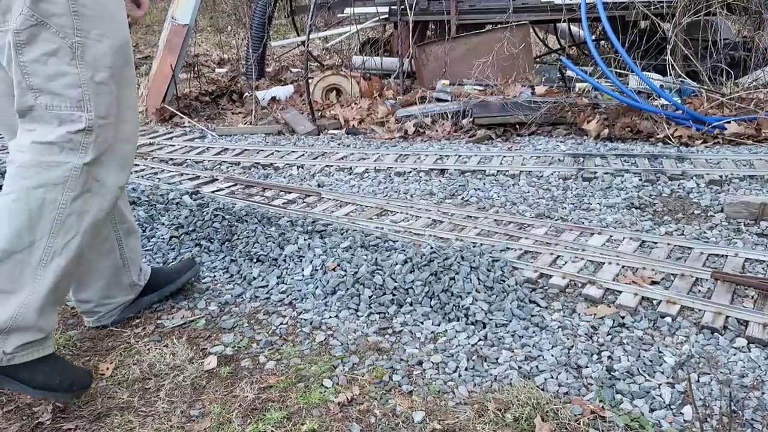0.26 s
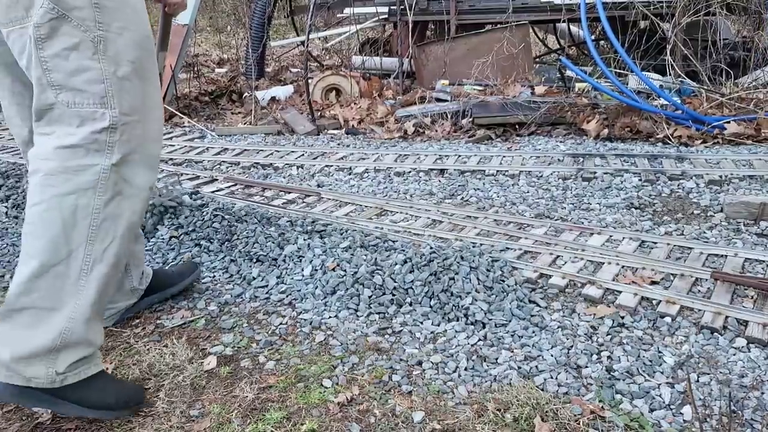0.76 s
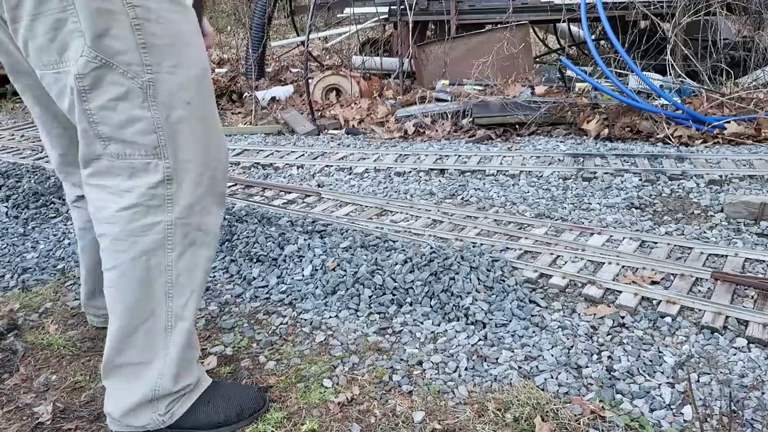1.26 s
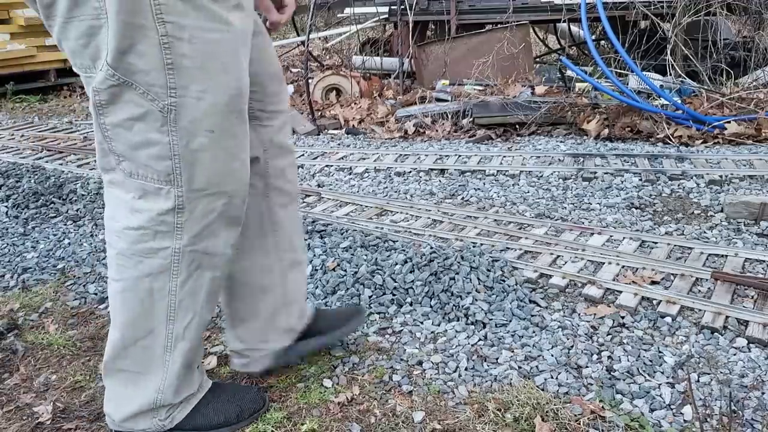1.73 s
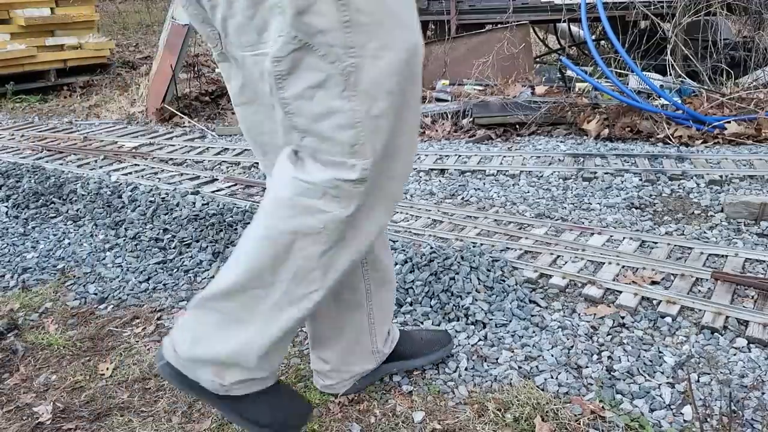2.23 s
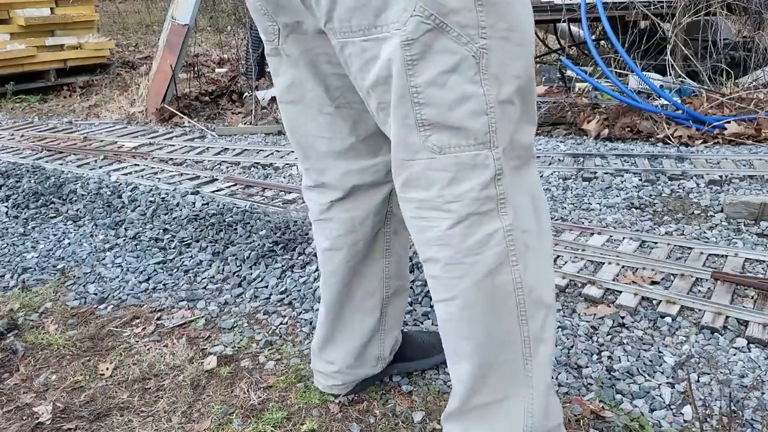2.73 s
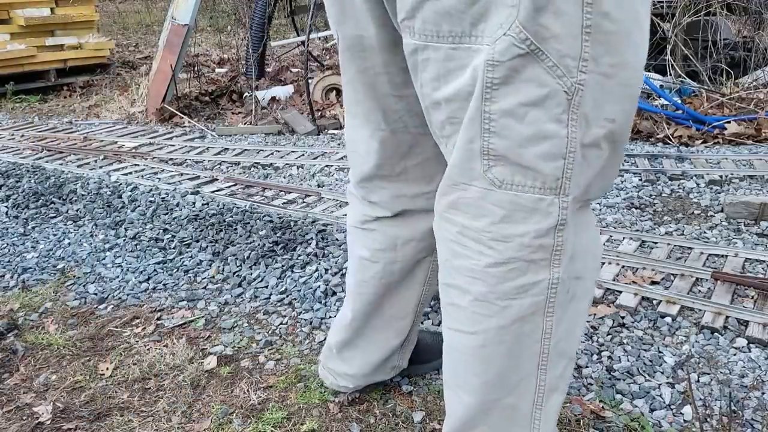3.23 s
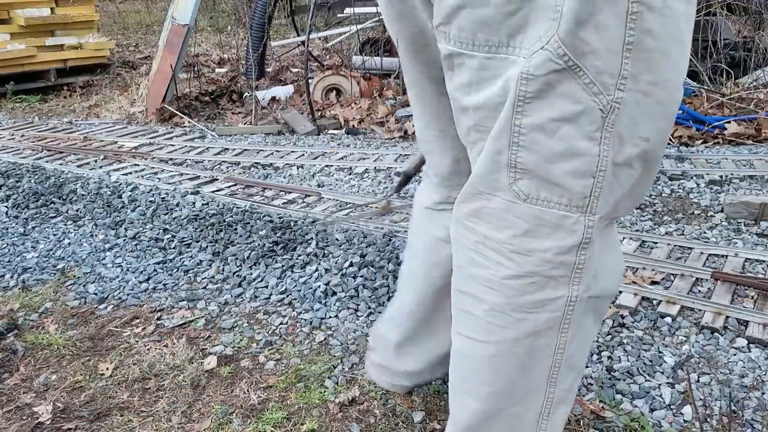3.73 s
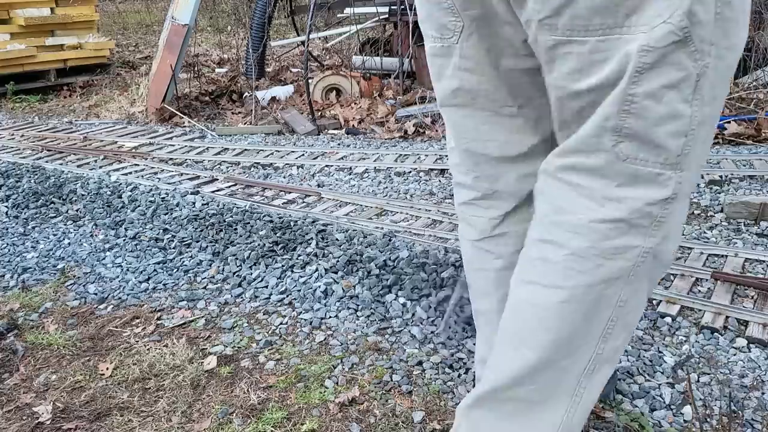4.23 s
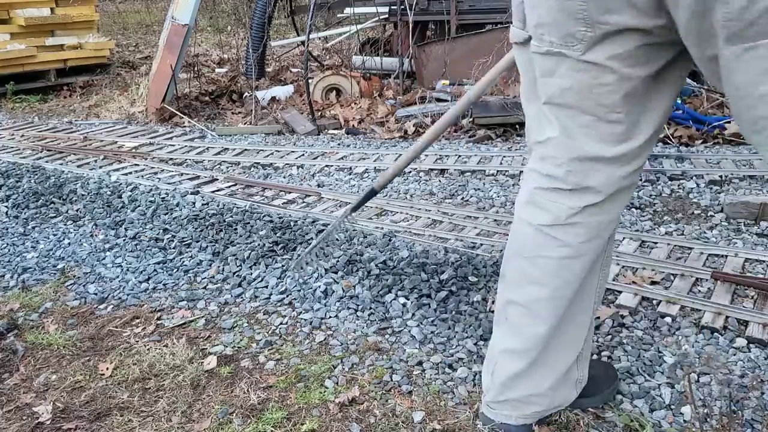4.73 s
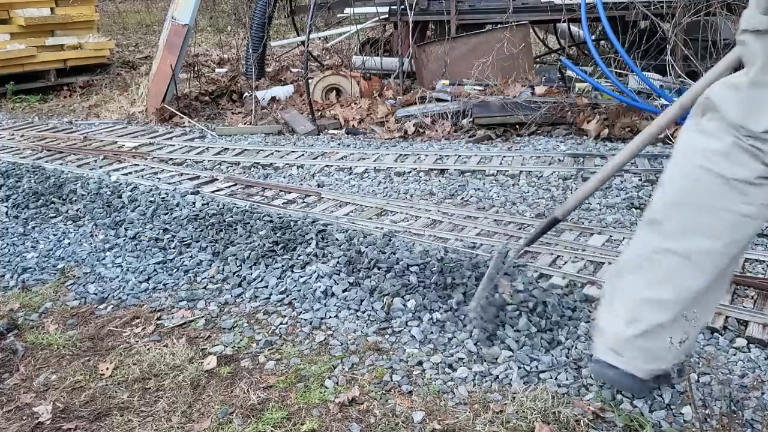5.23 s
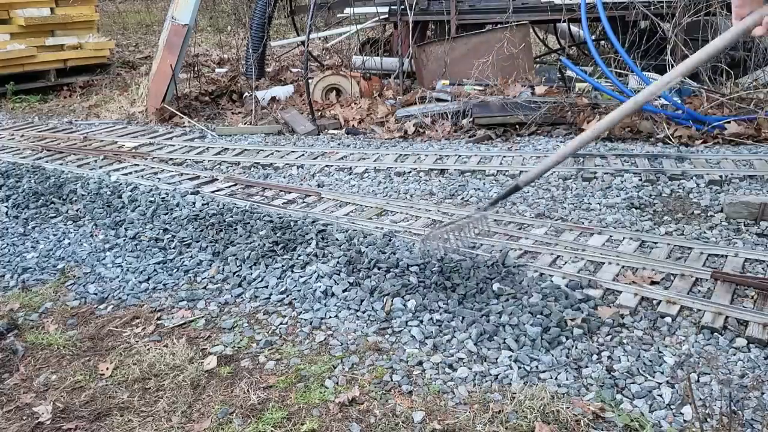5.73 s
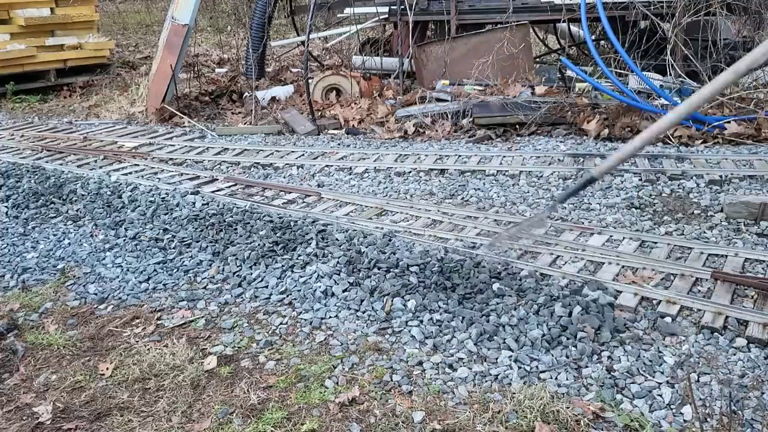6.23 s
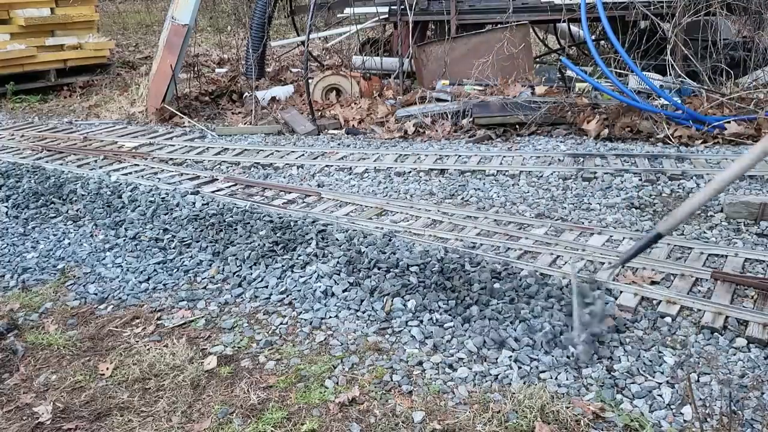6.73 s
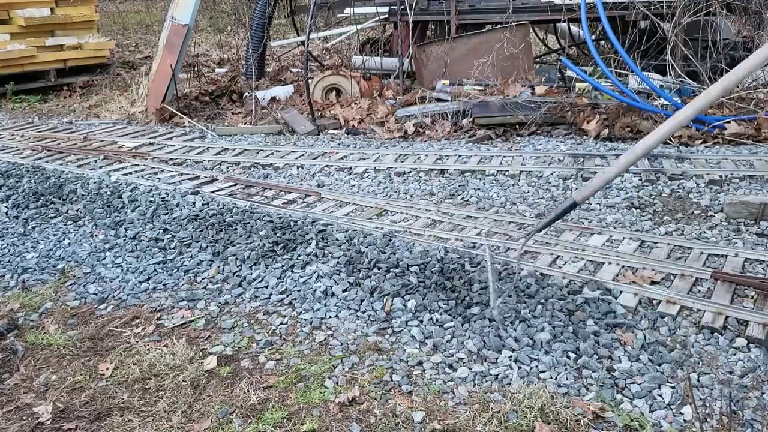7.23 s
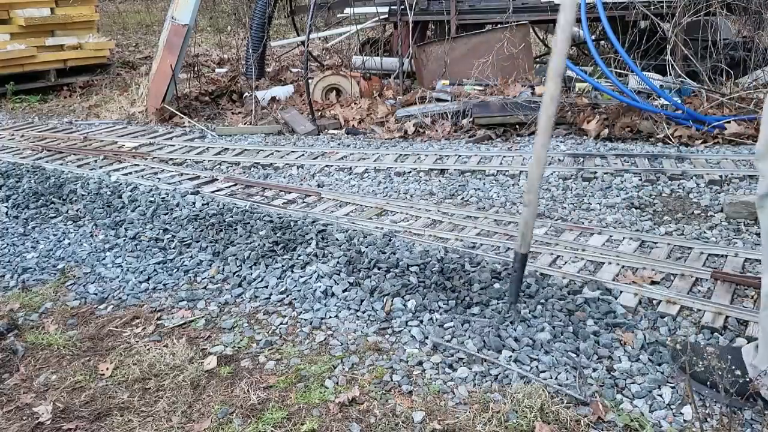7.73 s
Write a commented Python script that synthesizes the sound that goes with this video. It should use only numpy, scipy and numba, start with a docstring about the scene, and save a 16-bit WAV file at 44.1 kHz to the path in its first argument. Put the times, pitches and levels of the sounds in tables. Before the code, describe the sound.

Outdoors, a metre or two from the microphone, a faint hollow knock gives way to repeated raking of coarse gravel. Each pull brings a bright crunch and clatter with small metallic rings from the rake head, then loose pebbles tick as they settle. Shoes scuff lightly and bigger stones thud now and then. The last stroke is lighter, ending with a faint squeak over a soft background hush.

```python
"""Crushed stone crunches under a steel rake, dragged in short strokes across a yard.
Thousands of stones click against each other and the tines; the rake head rings and twice squeaks.
Shoes shift, big stones thud and pebbles trickle after the strokes. A hollow board rattles at the start,
and a faint outdoor hush fills the gaps. Heard from a metre or two, on a phone with two microphone ports."""
import sys
import numpy as np
from scipy import signal
from scipy.fft import rfft, irfft, next_fast_len
from scipy.io import wavfile
from scipy.ndimage import uniform_filter1d, map_coordinates
from numba import njit

SR = 44100
rng = np.random.default_rng(int(sys.argv[2]) if len(sys.argv) > 2 else 0)


def master(y):
    """Save y as 16-bit WAV."""
    cut = np.clip(np.atleast_2d(y).T, -1, 1)
    pcm = np.round(cut * 32767)  # scale
    wavfile.write(sys.argv[1], SR, pcm.astype(np.int16))


N = 351477
TIME = np.arange(N) / SR


def undb(db):
    return 10 ** (np.asarray(db) / 20)


def db_at(hz, points):
    """Reads (hz, db) points on a log-frequency axis."""
    point_hz, db = np.transpose(points)
    return np.interp(np.log(np.maximum(hz, 1)), np.log(point_hz), db)


def colour(x, points):
    """Filters by (hz, db) points."""
    size = next_fast_len(N)
    hz = np.arange(size // 2 + 1) * SR / size
    return irfft(rfft(x, size) * undb(db_at(hz, points)), size)[..., :N]


def wander(rate_hz):
    """Random levels, each gliding to the next; spread near 1."""
    hold = int(SR / rate_hz)
    steps = np.repeat(rng.standard_normal(N // hold + 1), hold)
    return 0.97 * uniform_filter1d(steps, hold)[:N]


@njit
def damped_sines(start, hz, t60, gain, onset_rate):
    """Rings with a rounded onset, each starting at its own fractional sample at each port."""
    out = np.zeros((2, N))
    for k in range(len(hz)):
        fall, turn = -np.log(1000.) / (t60[k] * SR), 2 * np.pi * hz[k] / SR
        pole, onset_pole = np.exp(complex(fall, turn)), np.exp(-onset_rate * turn)
        for port in range(2):
            first = max(int(start[port, k]) + 1, 0)
            late = first - start[port, k]
            phasor = gain[port, k] * np.exp(complex(fall, turn) * late)
            onset = np.exp(-onset_rate * turn * late)
            for i in range(first, min(first + int(.7 * t60[k] * SR), N)):
                out[port, i] += phasor.imag * (1 - onset)
                phasor *= pole
                onset *= onset_pole
    return out


def strike(start_s, db, hz, t60, pan_db, scatter_ms=0.):
    """Rings placed by lag and balance; low-mid waves bend round the phone and lag more."""
    bend = 1 + 2.4 / (1 + (hz / 900) ** 2 + (250 / hz) ** 2)
    lag_s = (by_stroke(start_s, STROKE_PATCHES, LAG_COLUMN) * bend + scatter_ms) / 1000
    side = np.array([[.5], [-.5]])
    return damped_sines((start_s + side * lag_s) * SR, hz, t60, undb(db + side * pan_db), onset_rate=0.58)


# The air beyond the yard: frequency_hz, density_db
HUSH_SPECTRUM = [(15, -39), (25, -9.5), (58, -1), (95, -4.5), (167, -11), (687, -24), (746, -17.5),
                 (979, -27), (3910, -42), (5570, -45.5), (8600, -54.5), (11900, -58.5), (16500, -49.5)]

def hush(level_db=-55.5):
    """Distant air and traffic; the bass is nearly alike at both ports."""
    mid, side = colour(rng.standard_normal((2, N)), HUSH_SPECTRUM)
    side = colour(side, [(60, -10.0), (150, -18), (600, 8), (2000, 4.5)])
    ports = mid + side * np.array([[1], [-1]])
    return ports * undb(level_db + 2.0 * wander(2.7)) / np.std(mid)


# Modes of a hollow board, centred between the ports: pitch_hz, level_db, t60_s
BOARD_MODES = [(131.6, -31, 0.53), (180.2, -28.5, 0.43), (324, -36.5, 0.31)]

def board():
    """A hollow knock dying away as the scene opens, its ring shaken by a rattle."""
    hz, db, t60 = np.transpose(BOARD_MODES)
    knock = strike(np.zeros_like(hz), db, hz, t60, pan_db=0.)
    return knock * undb(2.6 * wander(70)) * np.minimum(TIME / 0.025, 1)


# Shoes and big stones hit the bed, close by: start_s, level_db, pitch_hz
DULL_BLOWS = [(0.49, -32, 700), (0.583, -34, 380), (1.146, -26.5, 594), (1.196, -22, 700),
              (1.282, -40, 620), (1.87, -36, 397), (2.681, -25, 390), (2.724, -24, 557), (2.76, -23, 571),
              (2.832, -20.5, 191), (3.28, -40, 347), (3.873, -22, 562), (4.479, -40, 430),
              (4.797, -27.5, 710), (5.328, -40, 356), (5.372, -34, 596), (5.405, -27.5, 427),
              (5.762, -33, 293), (5.811, -35.5, 355), (5.841, -19, 361), (5.88, -14.5, 357),
              (5.905, -17.5, 397)]

def thuds(t60_s=0.016):
    """Low blows of a few cycles with a woody overtone."""
    start_s, db, hz = np.transpose(DULL_BLOWS)
    start_s, t60 = start_s + .0025, np.full_like(hz, t60_s)
    body = strike(start_s, db + 9.5, hz, t60, pan_db=-1.2)
    return body + strike(start_s, db + 5.0, 1.9 * hz, 0.64 * t60, pan_db=-1.)


# Single pebbles drop between strokes: start_s, level_db, pitch_hz
PEBBLE_DROPS = [(0.197, -52, 5860), (0.2204, -36.5, 6800), (1.6086, -37, 4530), (2.449, -47, 7470),
                (3.548, -33, 6360), (4.553, -38, 5900), (4.6344, -59, 5870), (4.6728, -53, 3430),
                (5.5415, -28.5, 5960), (6.1427, -40, 6000), (6.1594, -40, 7040), (6.181, -43, 6900),
                (6.199, -44, 6920), (6.2302, -41.5, 6000), (6.2526, -30, 3620), (6.2624, -43.5, 7500),
                (6.319, -41, 3600), (6.355, -45, 4000), (6.7347, -13, 13700), (6.7582, -27, 6280),
                (6.973, -36.5, 5700), (7.021, -39.5, 5820), (7.0494, -54, 6000), (7.0642, -61, 7360)]

def pebbles(surge_db, count=500, partials=7):
    """Thin bright ticks of settling pebbles: the listed drops and a random scatter."""
    when, pitch, luck = rng.random((count, 3)).T
    start_s = np.sort(when) * N / SR
    hz = 4000 + 5000 * pitch
    db = np.minimum(bed(start_s, hz, surge_db)[0], -48)  # ticks stay small in the thick of a stroke
    db = db + 4.5 - 2.7 * np.log(luck + .01)
    start_s, db, hz = np.hstack([[start_s, db, hz], np.transpose(PEBBLE_DROPS)])
    pan_db = by_stroke(start_s, STROKE_PATCHES, PAN_COLUMN)
    ratios = np.exp(0.61 * rng.standard_normal((len(hz), partials))).T
    t60 = np.full_like(hz, .004)
    return sum(strike(start_s, db - 7.5, np.clip(hz * r, 1500, 15500), t60, pan_db) for r in ratios)


# The rake head in the air, just right of centre: start_s, level_db, pitch_hz, t60_s
LIFT_RING = [(4.3, -63, 2064, 1.6)]

def lifted_head():
    """Clear of the stones, the steel rings on faintly."""
    return strike(*np.transpose(LIFT_RING), pan_db=-2.)


# A tine chatters on stone, one curve a squeak: time_s, pitch_hz, level_db, octave_db
SQUEAK_CURVES = [
    [(2.68, 1330, -32, -14), (2.716, 1274, -24, -23), (2.88, 1276, -37, -8)],
    [(7.74, 834, -53, -9), (7.85, 914, -40.5, -5), (7.94, 927, -47.5, -5), (7.97, 900, -60, -12)],
]

def squeaks(slips=70):
    """Uneven slips, each a short ring at the chatter pitch, its octave and a lower partial."""
    out = 0
    for time_s, pitch_hz, level_db, octave_db in map(np.transpose, SQUEAK_CURVES):
        start_s = rng.uniform(time_s[0], time_s[-1], slips)
        detune, force = rng.standard_normal((slips, 2)).T
        hz = np.interp(start_s, time_s, pitch_hz) * (1 + 0.015 * detune)
        db = np.interp(start_s, time_s, level_db) + 4.2 * force + 0.5
        for ratio, partial_db in [(1, 0), (2, np.interp(start_s, time_s, octave_db)), (.72, -11)]:
            out = out + strike(start_s, db + partial_db, hz * ratio, 55 / hz, pan_db=-1.6)
    return out


# Modes of the steel head: pitch_hz, level_db, t60_s
HEAD_MODES = [(860, -13, 0.013), (1027, 1, 0.074), (1170, -6, 0.014), (1303.5, 0, 0.11), (1406, -4.5, 0.22),
              (1786, 1, 0.09), (2042, 0, 0.051), (2256, -5, 0.18), (2706, -2.5, 0.11), (3308, -0.5, 0.072),
              (3506, 0, 0.041), (4044, -8.5, 0.13), (4980, -4.5, 0.07), (4810, -3.5, 0.023),
              (5570, -2.5, 0.044), (5870, -3.5, 0.021), (6400, -8.5, 0.016), (7470, -6, 0.044)]
# How strongly the steel rings, one row a stroke: low_modes_db, high_modes_db
HEAD_RING = [(-1, -0.5), (-3, 2.5), (0, 2), (-3.5, 1), (4, 3), (-3.5, -0.5), (-1.5, -2), (-3, 0), (-2, 1),
             (-1, 0.5), (-8, 3)]

def rake_head(surge_db, count=9000, ping_db=-8.5, spread_db=2.0):
    """Stones knock the steel head; each knock rings one of its modes."""
    when, pick, luck = rng.random((count, 3)).T
    detune, side = rng.standard_normal((count, 2)).T
    start_s = np.sort(when) * N / SR
    hz, mode_db, t60 = np.array(HEAD_MODES)[(pick * len(HEAD_MODES)).astype(int)].T
    hz = hz * (1 + .006 * detune)
    db, pan_db = bed(start_s, hz, surge_db)
    ring_db = np.where(hz < 2000, by_stroke(start_s, HEAD_RING, 0), by_stroke(start_s, HEAD_RING, 1))
    db = db + ring_db + mode_db + ping_db - spread_db * np.log(luck + 0.0079)
    return strike(start_s, db, hz, t60, pan_db + 5.64 * side)


# Typical ring of deep stones, big stones, crunch, grit and dust: pitch_hz
STONE_SIZE_HZ = [450, 1200, 2900, 6000, 12000]

def sizes(deep_db, big_db, grit_db, dust_db):
    """Levels of the five stone sizes relative to the crunch, as a column."""
    return np.array([[deep_db], [big_db], [0], [grit_db], [dust_db]])


# Shoes shift on the stones: start_s, length_s, crunch_db, then relative deep_db, grit_db, dust_db
SHOE_SHIFTS = [(0.048, 0.079, -52.5, 16, 14, 16), (0.718, 0.2, -61, -3, 17, 23),
               (1.518, 0.11, -64, -4, 16, 24.4), (3.438, 0.11, -68, 11.5, 18, 20),
               (5.308, 0.15, -50.5, 20.5, 5.9, 8.1), (6.028, 0.24, -54, -5, 2.3, 1.8),
               (6.708, 0.19, -53.5, 11.5, 9, 7.2)]

def shoe_power(t, big_db=-5.5):
    """Power by stone size as a sole presses, grinds grit and eases off."""
    power = 0
    for start_s, length_s, db, deep_db, grit_db, dust_db in SHOE_SHIFTS:
        press = np.sin(np.pi * np.clip((t - start_s) / length_s, 0, 1))
        power = power + (press * undb(db + sizes(deep_db, big_db, grit_db, dust_db))) ** 2
    return power


# One curve a stroke, from first touch and landing (second point) to the lift: time_s, drag_db
STROKE_CURVES = [
    [(-.02, -69), (0.0, -39.5), (.02, -45)],
    [(.31, -64), (.318, -46), (0.48, -25.5), (.61, -29.5)],
    [(.995, -66), (1.012, -38), (1.06, -46.5), (1.177, -26), (1.444, -35)],
    [(1.80, -69), (1.838, -35.5), (1.978, -23.5), (2.016, -43), (2.05, -29), (2.162, -30.5)],
    [(2.64, -73), (2.676, -41), (2.78, -32.5), (2.84, -23.5), (3.01, -39.5), (3.16, -35), (3.36, -44.5),
     (3.4, -42.5)],
    [(3.79, -61), (3.802, -41.5), (3.91, -43), (3.955, -29.5), (4.09, -31.5), (4.18, -39.5)],
    [(4.703, -75), (4.709, -27), (4.726, -22), (4.735, -24)],
    [(4.786, -64), (4.79, -29.5), (4.81, -33), (4.84, -28.5), (4.92, -29), (5, -30), (4.99, -39),
     (5.03, -29), (5.262, -41)],
    [(5.694, -49), (5.705, -38), (5.8, -30), (5.9, -25.5), (5.905, -20.5)],
    [(6.375, -56), (6.388, -42), (6.46, -58), (6.48, -31.5), (6.635, -25.5)],
    [(7.44, -62), (7.452, -35.5), (7.48, -46.5), (7.7, -55)],
]
# How each stroke begins and ends: landing_db, settle_db_per_s, trickle_db, trickle_tilt_db_per_size
STROKE_ENDS = [(-60, 178, -65, .5), (-33, 163, -53.5, 1), (-31, 205, -60, .5), (-46.5, 110, -51.5, 3),
               (-25.5, 203, -56, .5), (-26, 91, -56.5, .5), (-32, 899, -71, -2.5), (-30.5, 80.5, -60, -0.5),
               (-17.5, 194, -59, -3), (-25, 345, -59.5, 0), (-49, 34, -70.5, -4)]
# The ground under each stroke and where it lies from the phone: deep_db, big_db, grit_db, dust_db,
# brighten_db_per_s_per_size, left_minus_right_db, left_base_lag_ms
STROKE_PATCHES = [(8, 0, 0, 4, -1, -0.5, -0.14), (-6, 4, -2, -6, 4, 2.1, -.14),
                  (-5, 2.5, -3, -4.5, 5.5, 1, -0.13), (-8, -1.5, 0.5, -6, 6, 0, -0.013),
                  (0, 0, 1.5, -5, 3, -3.5, 0.13), (-7, -6, 1, -1.5, 4, 0, 0.053),
                  (-30, -12, -7, -32.5, 6, -1, 0.029), (-6.5, -4.5, -1.5, 0, 2.5, -3, 0.086),
                  (-1, -5, 1, -2, -4.5, -2.5, 0.13), (-18, -2.5, -0.5, 3.5, -11.5, -2, 0.16),
                  (1.5, -2, -3, -2, -10, -1.5, 0.13)]
PAN_COLUMN, LAG_COLUMN = 5, 6

def stroke_power(t, landing_s=0.011, landing_fall_db_per_s=501.5, trickle_fall_db_per_s=38.5):
    """Power by stone size: the rake lands, drags and lifts; the bed settles and late stones roll on."""
    power = 1e-10
    size_step = np.arange(len(STONE_SIZE_HZ))[:, None] - 2
    landing_mix, trickle_mix = sizes(-11, -7.5, -5.5, -6.5), sizes(14, 2.5, 6.6, 3.5)
    for curve, ends, patch in zip(STROKE_CURVES, STROKE_ENDS, STROKE_PATCHES):
        time_s, drag_db = np.transpose(curve)
        landing_db, settle_db_per_s, trickle_db, tilt_db = ends
        age, since_lift = t - time_s[1], np.maximum(t - time_s[-1], 0)
        patch_mix = sizes(*patch[:4])
        brighten = patch[4] * size_step * np.clip(age, 0, time_s[-1] - time_s[1])
        drag = np.interp(t, time_s, drag_db, left=-120) - settle_db_per_s * since_lift + brighten
        landing = landing_db - landing_fall_db_per_s * np.maximum(age - landing_s, 0)
        trickle = trickle_db + tilt_db * size_step - trickle_fall_db_per_s * since_lift
        power = power + undb(drag + patch_mix) ** 2
        power += (age > 0) * undb(landing + landing_mix + patch_mix) ** 2
        power += (since_lift > 0) * undb(trickle + trickle_mix) ** 2
    return power


def by_stroke(t, table, column):
    """A property of the strokes at times t, gliding from the middle of one to the next."""
    middle_s = [(curve[0][0] + curve[-1][0]) / 2 for curve in STROKE_CURVES]
    return np.interp(t, middle_s, np.array(table)[:, column])


def bed(t, hz, surge_db):
    """Level and balance, both in dB, of the moving stones at sorted times t and pitches hz."""
    power = stroke_power(t) + shoe_power(t)
    # the fewer stones still move, the more they come apart into single ticks
    patchiness = np.interp(10 * np.log10(power[2]), [-60, -30], [1.4, 1.1])
    power = power * undb(patchiness * surge_db[(t * SR).astype(int)]) ** 2 + rattle_power(t)
    size_index = np.interp(np.log(hz), np.log(STONE_SIZE_HZ), np.arange(len(STONE_SIZE_HZ)))
    db = map_coordinates(10 * np.log10(power), [size_index, np.arange(len(t))], order=1)
    return db, by_stroke(t, STROKE_PATCHES, PAN_COLUMN)


# Tines bite or stones collide, a metre or two away: start_s, level_db, pitch_hz, rattle_t60_s
COLLISIONS = [(0.026, -22, 6050, 0.031), (0.16, -25, 1410, 0.03), (0.3212, -32, 4800, 0.066),
              (0.431, -16, 3520, 0.089), (0.4549, -18, 5500, 0.052), (0.4817, -15, 1320, 0.13),
              (0.586, -20, 1400, 0.08), (0.8127, -36, 6900, 0.027), (0.838, -39, 7500, 0.028),
              (0.8847, -20.5, 7500, 0.032), (1.0154, -13, 2210, 0.053), (1.0536, -20.5, 2120, 0.1),
              (1.076, -13.5, 5200, 0.059), (1.1402, -12.5, 1120, 0.24), (1.1703, -11.5, 1120, 0.24),
              (1.264, -13.5, 1390, 0.24), (1.4084, -13, 2240, 0.08), (1.456, -20, 1800, 0.2),
              (1.6768, -35.5, 4430, 0.027), (1.8366, -24.5, 1250, 0.1), (1.8697, -15, 5230, 0.058),
              (1.9043, -16, 3020, 0.17), (1.954, -8, 4720, 0.054), (2.0233, -12.5, 2660, 0.11),
              (2.0439, -7, 2300, 0.11), (2.099, -8, 3380, 0.11), (2.1436, -13.5, 4030, 0.24),
              (2.232, -16.5, 1770, 0.033), (2.712, -17, 1320, 0.065), (2.7504, -11.5, 1270, 0.18),
              (2.8203, -10.5, 1270, 0.13), (2.8614, -6.5, 7300, 0.056), (2.9215, -15.5, 6100, 0.099),
              (2.953, -15.5, 6300, 0.063), (3.0577, -16.5, 1940, 0.088), (3.1867, -27, 1360, 0.19),
              (3.2947, -20.5, 1340, 0.032), (3.3657, -28, 3410, 0.089), (3.6502, -29.5, 6700, 0.049),
              (3.8126, -17.5, 1870, 0.08), (3.8492, -17, 1550, 0.13), (3.8751, -16, 1140, 0.095),
              (3.9409, -15, 3390, 0.08), (4.023, -15, 4830, 0.08), (4.0447, -6, 5550, 0.17),
              (4.102, -16.5, 5060, 0.13), (4.152, -15.5, 4200, 0.16), (4.2138, -25.5, 2320, 0.17),
              (4.7081, -16, 2780, 0.16), (4.7294, -9.5, 2980, 0.033), (4.7576, -39, 2970, 0.055),
              (4.799, -8.5, 3460, 0.059), (4.8218, -9, 4170, 0.24), (4.852, -7, 3720, 0.16),
              (4.9314, -4, 3170, 0.21), (5.001, -9, 5400, 0.055), (5.0226, -12, 1990, 0.2),
              (5.1472, -15.5, 3500, 0.12), (5.1874, -19.5, 5600, 0.12), (5.3503, -24.5, 7370, 0.18),
              (5.4733, -29, 5750, 0.08), (5.7062, -5, 6620, 0.08), (5.7605, -7.5, 5300, 0.072),
              (5.7864, -16, 4930, 0.09), (5.8064, -5.5, 5450, 0.19), (5.8844, -15, 6700, 0.08),
              (6.0501, -23.5, 6140, 0.14), (6.093, -26, 5530, 0.083), (6.3904, -28, 4720, 0.08),
              (6.4049, -11, 3900, 0.24), (6.4827, -21, 6310, 0.055), (6.501, -15, 5400, 0.066),
              (6.533, -10, 3400, 0.17), (6.554, -1.5, 2040, 0.078), (6.667, -22.5, 5240, 0.22),
              (6.7454, -26, 6110, 0.11), (6.787, -20.5, 5660, 0.044), (6.833, -29, 4710, 0.03),
              (6.8497, -26.5, 1450, 0.031), (6.8887, -24, 6000, 0.027), (7.451, -20, 4660, 0.055),
              (7.529, -40, 6250, 0.17), (7.6184, -33, 6250, 0.11), (7.696, -33, 1790, 0.13)]

def clacks(surge_db, partials=5):
    """Each loud collision: its main ring and a spray of short partials."""
    start_s, db, hz, _ = np.transpose(COLLISIONS)
    pan_db = bed(start_s, hz, surge_db)[1]
    ratios = np.exp(0.41 * rng.standard_normal((len(hz), partials))).T
    t60 = .005 + 22 / hz
    spray = sum(strike(start_s, db - 22, np.clip(hz * r, 800, 15000), 0.89 * t60, pan_db) for r in ratios)
    return strike(start_s, db - 5.5, hz, t60, pan_db) + spray


def rattle_power(t, falloff_db_per_octave=2):
    """A collision cracks many stones at once, favouring its own size; the loosened ones rattle on."""
    power = np.zeros((len(STONE_SIZE_HZ), len(t)))
    for start_s, db, hz, t60 in COLLISIONS:
        first, last = np.searchsorted(t, [start_s, start_s + t60])
        age = t[first:last] - start_s
        patch_mix = sizes(*(by_stroke(start_s, STROKE_PATCHES, k) for k in range(4)))
        octaves = abs(np.log2(np.array(STONE_SIZE_HZ)[:, None] / hz))
        crack = undb(db - 13.0 - 60 * age / 0.014) ** 2
        rattle = undb(db - 9.5 - 60 * age / t60) ** 2
        power[:, first:last] += undb(patch_mix - falloff_db_per_octave * octaves) ** 2 * (crack + rattle)
    return power


# The crunch of crushed stone from a metre or two: frequency_hz, density_db
STONE_SPECTRUM = [(110, -23.5), (350, -8.5), (650, -6), (1300, -3), (2500, -5.5), (4500, -7.5), (7000, -5),
                  (11000, -17.5), (16000, -17.5)]

def gravel(surge_db, count, cycles, short_t60_s, spread_db, level_db):
    """Stone clicks of all sizes, each a damped ring; a few are louder than the rest."""
    when, pitch, luck = rng.random((count, 3)).T
    length, side, lag = rng.standard_normal((count, 3)).T
    start_s = np.sort(when) * N / SR
    hz = 110 + 16000 * pitch ** 1.7
    t60 = np.maximum(cycles / hz, short_t60_s) * np.exp(0.57 * length)
    db, pan_db = bed(start_s, hz, surge_db)
    # rings are stronger where they are sparse in pitch and where they are short
    fill_db = 10 * np.log10((hz / 3000) ** 0.11 * 0.0052 / t60)
    db = db + db_at(hz, STONE_SPECTRUM) + fill_db - spread_db * np.log(luck + 0.0081) + level_db
    return strike(start_s, db, hz, t60, pan_db + 7.0 * side, scatter_ms=0.043 * lag)


def yard(direct, t60_s=0.13, wet_db=-12):
    """Short scatter from the ground and the junk nearby, different at each port."""
    t = TIME[:SR // 4]
    tail = rng.standard_normal((2, len(t))) * undb(-60 * t / t60_s) * (t > .002)
    tail /= np.linalg.norm(tail, axis=1, keepdims=True)
    return direct + undb(wet_db) * signal.fftconvolve(direct, tail, axes=1)[:, :N]


def scene():
    """Stones, rake and board in the yard; close thuds; the hush under all."""
    surge_db = 1.21 * wander(40) + 2.13 * wander(150)  # stones slip in clusters
    clinks = gravel(surge_db, count=3000, cycles=70., short_t60_s=.012, spread_db=3.5, level_db=8.5)
    crunch = gravel(surge_db, count=70000, cycles=24., short_t60_s=.0079, spread_db=2.5, level_db=2.5)
    stones = crunch + clinks + pebbles(surge_db) + clacks(surge_db)
    steel = rake_head(surge_db) + squeaks() + lifted_head()
    return yard(stones + steel + board()) + thuds() + hush()


# Overall tone colour: frequency_hz, gain_db
TONE_COLOUR = [(20, -21), (45, -9.5), (7400, 1.5), (8300, -6), (10000, -1), (12500, 6.5), (15000, 2.5),
               (17000, -15)]

def record(dry, ceiling=.75, top_hz=16000):
    """Thin bass, a dip near 8 kHz, a lift near 12 kHz; the loudest peaks rounded, the top cut off."""
    rounded = ceiling * np.tanh(colour(dry, TONE_COLOUR) / ceiling)
    return signal.sosfilt(signal.ellip(12, .2, 110, top_hz, fs=SR, output="sos"), rounded)


dry = scene()
out = record(dry)
master(out)
```